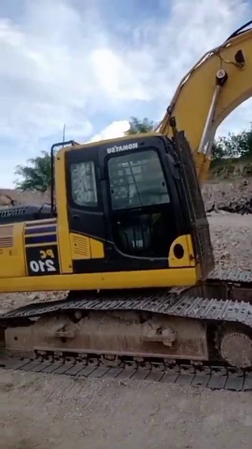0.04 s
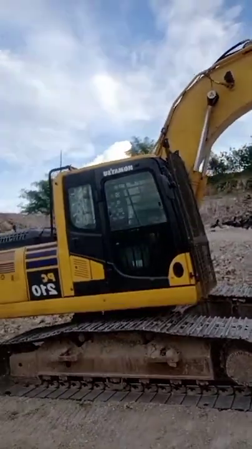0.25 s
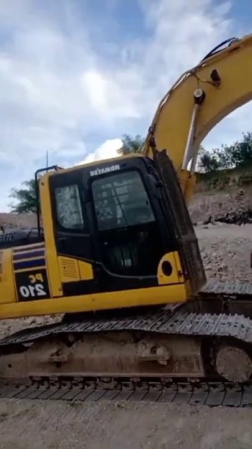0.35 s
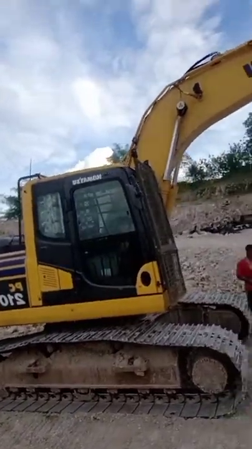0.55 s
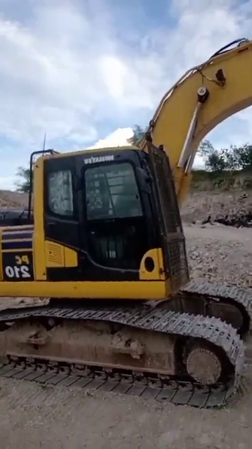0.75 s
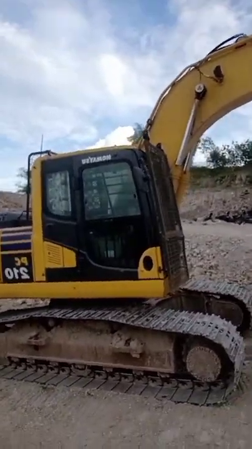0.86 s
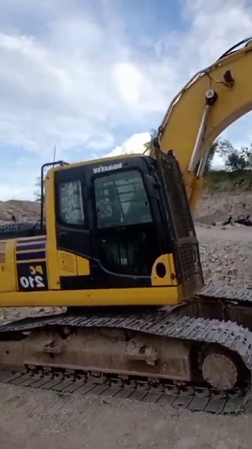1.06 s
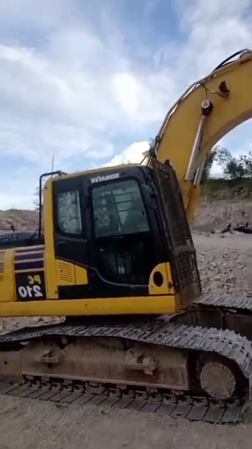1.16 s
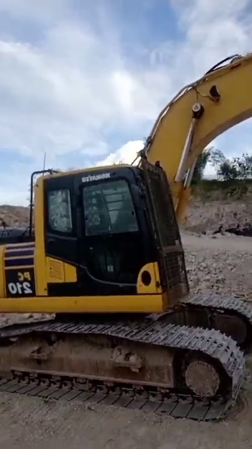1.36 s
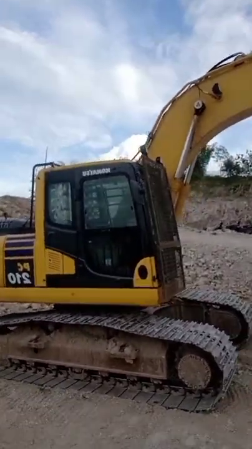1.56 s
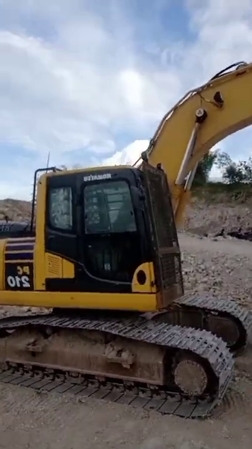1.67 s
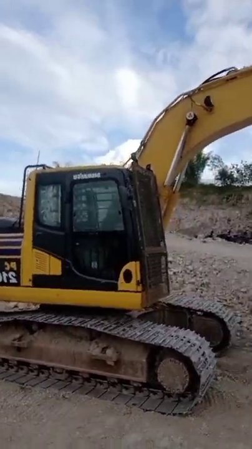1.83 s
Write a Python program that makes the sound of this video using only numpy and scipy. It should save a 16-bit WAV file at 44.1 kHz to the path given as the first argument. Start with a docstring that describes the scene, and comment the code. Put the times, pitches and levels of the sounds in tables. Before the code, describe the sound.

Two heavy metal bangs from an excavator, then lighter knocks and a fading rumble.

```python
"""An open quarry, with an excavator at work. Steel squeaks under load, then two heavy blows set the
machine ringing and rattling, and lighter ones follow. Each blow wakes a dense wash of steel modes,
with a few plate tones singing out. A low rumble dies away while stones click and gravel crunches;
a thin squeal and the faint paired chirps of a far insect or bird sit in the outdoor hiss."""
import sys
import numpy as np
from scipy import signal
from scipy.fft import rfft, irfft
from scipy.io import wavfile
from scipy.ndimage import uniform_filter1d

SR = 44100
rng = np.random.default_rng(int(sys.argv[2]) if len(sys.argv) > 2 else 0)


def generate_wav(sig):
    """Save sig (samples, or channels by samples) to the path in sys.argv[1] as 16-bit PCM at SR."""
    pcm = np.round(np.clip(np.atleast_2d(sig).T, -1, 1) * 32767).astype(np.int16)
    wavfile.write(sys.argv[1], SR, pcm)


N = 83790
T = np.arange(N) / SR
HZ = np.maximum(np.fft.rfftfreq(N, 1 / SR), 1)


def from_db(db):
    """Decibels to gain."""
    return 10 ** (np.asarray(db) / 20)


def rms_one(x):
    """Scale to unit power."""
    return x / np.sqrt(np.mean(x ** 2) + 1e-20)


def over_hz(hz, values, at=HZ):
    """Read values along a log-frequency axis."""
    return np.interp(np.log(at), np.log(hz), values)


def colour(points):
    """Gain at every frequency of an EQ curve."""
    return from_db(over_hz(*np.transpose(points)))


def level(points):
    """Gain at every moment of a fader curve."""
    return from_db(np.interp(T, *np.transpose(points)))


def evened(x, span_s):
    """Noise with its chance swells smoothed out."""
    power = uniform_filter1d(np.mean(x ** 2, axis=0), max(int(span_s * SR), 3))
    return x / np.sqrt(power + 1e-9)


def drift(rate_hz):
    """Smooth random modulation with a spread of one."""
    return rms_one(irfft(rfft(rng.standard_normal(N)) * np.exp(-(HZ / rate_hz) ** 2), N))


def fade(start, time_s):
    """Sudden start, exponential decay."""
    return (T >= start) * np.exp(-np.maximum(T - start, 0) / time_s)


def struck(start, rise_s, t60):
    """Envelope of a ring that builds up during the contact and then dies."""
    return np.clip((T - start) / rise_s, 0, 1) * from_db(-60 * np.maximum(T - start - rise_s, 0) / t60)


def chatter(per_s, time_s, share):
    """Gain of a sound that gets a share of its power in brief, rounded random contacts."""
    contacts = (rng.random(N) < per_s / SR) * rng.exponential(1, N)
    pole = np.exp(-2 / (time_s * SR))
    power = signal.lfilter([1], [1, -2 * pole, pole * pole], contacts + 1e-18)
    return np.sqrt(1 - share + share * power / power.mean())


# Stereo image, leaning right: (frequency [Hz], left minus right [dB], side level [dB])
STEREO_IMAGE = [(110, -1.5, -21.5), (370, -2, -14.5), (1280, -1.1, -6.5), (2420, -3.5, -2.5),
                (4670, -6.5, -2), (10000, -5, 1)]


def pan(hz):
    """Left and right gain at the given frequencies."""
    image_hz, pan_db, _ = np.transpose(STEREO_IMAGE)
    return from_db(np.array([[1], [-1]]) * over_hz(image_hz, pan_db, hz) / 2)


def noise(gains, reflection_s=0.000919):
    """Coloured stereo noise of unit power; a near reflection and diffuse sound widen the treble."""
    image_hz, _, side_db = np.transpose(STEREO_IMAGE)
    mid, diffuse = rfft(rng.standard_normal((2, N)))
    reflection = mid * np.exp(-2j * np.pi * HZ * reflection_s) / 2
    side = from_db(over_hz(image_hz, side_db)) * (reflection + diffuse / np.sqrt(2))
    return rms_one(irfft(np.array([mid + side, mid - side]) * gains * pan(HZ), N))


# EQ of the outdoor hiss: (frequency [Hz], relative level [dB])
HISS_EQ = [(300, -20), (1100, 6.5), (1600, -1), (2450, 4.5), (3300, -5), (4100, -5.5), (4850, 3),
           (5900, -5.5), (6700, -10), (10000, -26.5), (14000, -20)]
# Fader ride of the hiss and the squeal in it: (time [s], level [dB])
HISS_FADER = [(0, -48), (.5, -46.5), (.9, -57.5), (1.2, -52), (1.45, -55.5), (1.6, -58), (1.8, -58),
              (1.9, -53)]


def gravel_hiss():
    """A bed of outdoor hiss, gritty with the tiny contacts of crunching gravel."""
    grit = chatter(per_s=540, time_s=0.0021, share=0.36)
    return grit * noise(colour(HISS_EQ)) * level(HISS_FADER)


def squeal(hz=4970, glide_hz=230.6, jitter_rate_hz=230.6, above_hiss_db=-14.5, flicker_db=6.5):
    """A thin, high squeal slides about in pitch and flickers within the hiss."""
    pitch = hz + glide_hz * (drift(10) + drift(jitter_rate_hz) / 2)
    tone = np.sin(2 * np.pi * np.cumsum(pitch) / SR)
    flickering = rms_one(tone * from_db(flicker_db * drift(40)))
    return pan(hz) * from_db(above_hiss_db) * flickering * level(HISS_FADER)


def chirps(top_hz=7050, fall_hz_per_s=60000, length_s=.014, db=-66):
    """A far insect or bird repeats a pair of tiny falling notes."""
    first_s, every_s, pair_s = .602, .1275, .023
    out = np.zeros(N)
    for pair_start in np.arange(first_s, T[-1], every_s):
        for start in (pair_start, pair_start + pair_s):
            age = np.clip(T - start, 0, length_s)
            turns = age * (top_hz - fall_hz_per_s * age / 2)
            out += np.sin(np.pi * age / length_s) * np.sin(2 * np.pi * turns)
    return from_db(db) * out


# EQ of the low end: (frequency [Hz], relative level [dB])
RUMBLE_EQ = [(50, -38), (102, 3), (122, 2), (152, 6.5), (200, -6.5), (400, -48.5)]
# Fader ride of the rumble: (time [s], level [dB])
RUMBLE_FADER = [(0, -39.5), (.14, -43), (.2, -52), (.45, -38.5), (.82, -52), (1.1, -48.5), (1.55, -60),
                (1.9, -67)]


def rumble():
    """A smooth low rumble swells around the heavy blows and ebbs away."""
    return evened(noise(colour(RUMBLE_EQ)), span_s=0.0283) * level(RUMBLE_FADER)


# EQ of the grinding: (frequency [Hz], relative level [dB])
GRIND_EQ = [(60, -4.5), (260, 0), (750, -3.5), (1500, -14.5), (2400, -13.5), (6000, -54)]
# Fader ride of the grinding: (time [s], level [dB])
GRIND_FADER = [(0, -43.5), (.6, -45), (.78, -46), (.98, -43), (1.12, -54.5), (1.6, -61), (1.85, -56)]


def grinding():
    """Grinding noise fills the mids, then drops back after a second."""
    return noise(colour(GRIND_EQ)) * level(GRIND_FADER)


# Steel-on-steel squeak cues, and a brief high ring of the steel after a blow: (time [s], length [s], pitch
# [Hz], width [Hz], level [dB])
SQUEAK_CUES = [(0.014, 0.028, 5256, 120, -42), (0.118, 0.21, 2060, 380, -40), (0.513, 0.03, 6030, 160, -44)]


def squeaks(flutter_db=3.4, flutter_hz=70):
    """Uneven slipping drives narrow resonances of the steel; a blow also sets one high resonance briefly
    ringing."""
    out = 0
    for start, length, hz, width_hz, db in SQUEAK_CUES:
        resonance = 1 / (1 + (2 * (HZ - hz) / width_hz) ** 2)
        tone = evened(noise(resonance), span_s=0.0058)
        flutter = rms_one(noise(np.exp(-(HZ / flutter_hz) ** 2))[0])
        swell = np.sqrt(np.abs(np.sin(np.pi * np.clip((T - start) / length, 0, 1))))
        out = out + tone * swell * from_db(db + flutter_db * flutter)
    return out


# Knock cues, from deep thumps to ticks: (time [s], level [dB], centre [Hz], width [octaves], decay [s])
KNOCK_CUES = [(0.198, -23.5, 1970, 0.4, 0.0012), (0.234, -21, 326, 0.3, 0.028),
              (0.243, -28.5, 88, 0.53, 0.037), (0.411, -32.5, 5590, 0.033, 0.026),
              (0.412, -52, 13600, 0.15, 0.016), (0.431, -32, 81, 0.36, 0.024),
              (0.881, -38, 716, 0.81, 0.014), (0.9076, -31.5, 5110, 0.18, 0.00051),
              (0.9115, -30, 417, 0.71, 0.013), (1.074, -39, 2460, 0.9, 0.0042),
              (1.094, -42.5, 5100, 0.3, 0.0071), (1.165, -41.5, 1520, 0.92, 0.0063),
              (1.189, -43, 1000, 0.79, 0.0086), (1.251, -44, 710, 0.86, 0.011),
              (1.345, -36.5, 2310, 0.25, 0.0016), (1.51, -44.5, 2130, 0.32, 0.015),
              (1.513, -45, 810, 0.11, 0.006), (1.583, -42.5, 360, 0.86, 0.0059),
              (1.660, -48.5, 5440, 0.24, 0.0035), (1.750, -48, 1810, 0.36, 0.0075),
              (1.8044, -41.5, 1150, 0.73, 0.006), (1.833, -43.5, 4660, 0.24, 0.0045)]


def knocks(tail_db=-20, tail_s=0.043):
    """Frame, track links and stones knock: a one-cycle attack, heavy damping, a faint scattered tail."""
    out = 0
    for start, db, hz, octaves, decay_s in KNOCK_CUES:
        band = 1 / (1 + (np.log2(HZ / hz) / octaves) ** 2 / 2) ** 2
        body = evened(noise(band), span_s=5 / hz)
        attack = np.sin(np.pi / 2 * np.clip((T - start) * hz, 0, 1)) ** 2
        decay = fade(start, decay_s) + from_db(tail_db) * fade(start, tail_s)
        out = out + from_db(db) * body * attack * decay
    return out


# EQ of the dense steel ring: (frequency [Hz], relative level [dB])
STEEL_EQ = [(40, -32), (62, -18), (135, 3), (185, -2), (248, -9.5), (300, -1), (410, 0.5), (500, -7),
            (720, -7), (950, -11), (1550, -17), (2750, -14.5), (3250, -23), (5100, -22), (5900, -25),
            (6800, -32.5), (10000, -49), (14500, -71)]
# The five bands of a blow, thud to sizzle: (centre [Hz], t60 [s])
BLOW_BANDS = [(125, 0.6), (340, 0.54), (750, 0.71), (2000, .55), (5500, 0.39)]
# Hits on the steel: (time [s], contact rise [s], ring length [x band t60],
# thud [dB], boom [dB], clang [dB], clash [dB], sizzle [dB])
BLOW_CUES = [(0.241, 0.02, .9, -35, -23, -23.5, -25, -33),
             (0.285, 0.029, 1.05, -56, -24.5, -28, -32, -38.5),
             (0.409, 0.0089, .7, -27, -61, -25, -23.5, -29), (0.425, 0.0039, .8, -24, -42, -50, -52, -57),
             (0.514, 0.011, .9, -59, -36.5, -38.5, -42, -39.5),
             (0.912, 0.0014, .7, -47.5, -40.5, -39, -39, -51)]


def steelwork():
    """Each blow wakes countless close modes, the low ones a little later; loose parts rattle along."""
    centres, t60s = np.transpose(BLOW_BANDS)
    rattle = chatter(per_s=90, time_s=0.014, share=0.34)
    out = 0
    for band, solo in enumerate(np.eye(len(centres))):
        crossover = np.sqrt(over_hz(centres, solo))
        ring = evened(noise(colour(STEEL_EQ) * crossover), span_s=0.016)
        power = 0
        for start, rise, length, *band_dbs in BLOW_CUES:
            envelope = struck(start, rise + 1 / centres[band], length * t60s[band])
            power += (from_db(band_dbs[band]) * envelope) ** 2
        out = out + ring * np.sqrt(power) * (rattle if band else 1)   # no rattle on the thud
    return out


# Strongest tones of the steel plates: (pitch [Hz], level relative to the blow [dB], t60 [s])
PLATE_MODES = [(100.6, -10.5, 0.7), (135, -9, 0.94), (154, -1.5, 0.57), (218.8, -6.5, 1.0), (279, -1, 0.38),
               (396.5, -5.5, 0.81), (499, -11, 0.8), (544.6, -15, 0.84), (687, -6.5, 0.41),
               (768.4, -5.5, 0.37), (898, -3.5, 0.22), (1282, -11.5, 0.37), (1903, -9, 0.18)]


def plates(wander_hz=2.56):
    """The strained plates sing out of the ring, wavering in pitch; every blow adds to their energy."""
    centres, _ = np.transpose(BLOW_BANDS)
    out = 0
    for hz, mode_db, t60 in PLATE_MODES:
        power = 0
        for start, rise, _, *band_dbs in BLOW_CUES:
            gain = from_db(mode_db + over_hz(centres, band_dbs, hz))
            power += (gain * struck(start, rise + 1 / hz, t60)) ** 2
        turns = np.cumsum(hz + wander_hz * drift(21)) / SR + rng.random()
        out = out + pan(hz) * np.sqrt(power) * np.sin(2 * np.pi * turns)
    return out


def scene():
    """The machine up front, over the quarry bed."""
    machine = steelwork() + plates() + knocks() + squeaks()
    return machine + gravel_hiss() + rumble() + grinding() + squeal() + chirps()


def record(dry, low_cut_hz=56, high_cut_hz=15600):
    """The microphones lose the deepest bass; the top is cut steeply."""
    low_cut = signal.butter(4, low_cut_hz, "high", fs=SR, output="sos")
    high_cut = signal.ellip(10, .1, 80, high_cut_hz, fs=SR, output="sos")
    return signal.sosfilt(high_cut, signal.sosfilt(low_cut, dry))


dry = scene()
out = record(dry)
generate_wav(out)
```